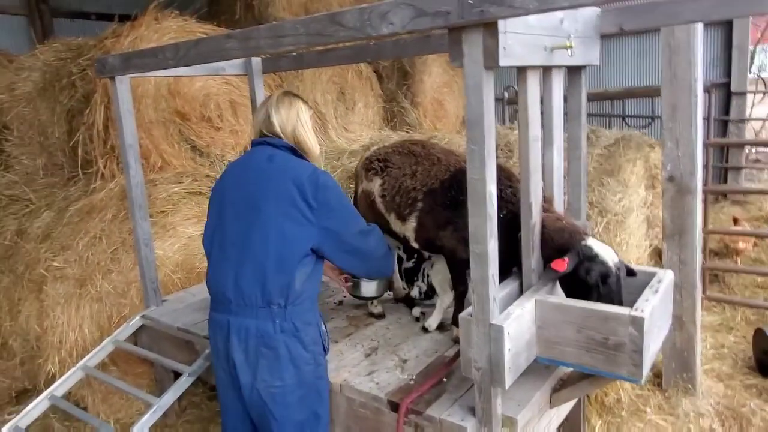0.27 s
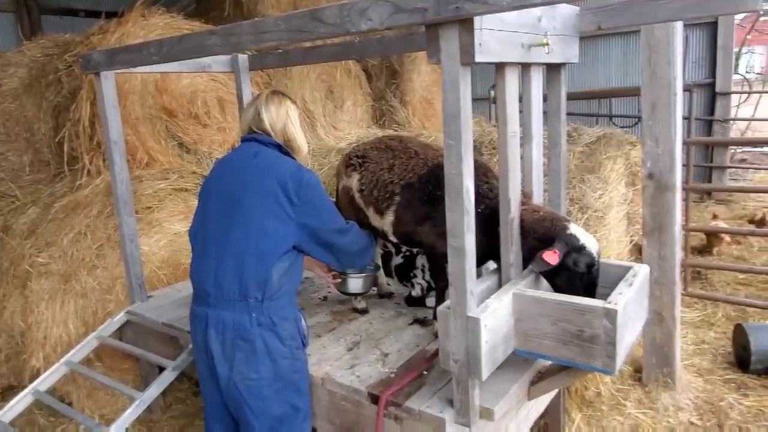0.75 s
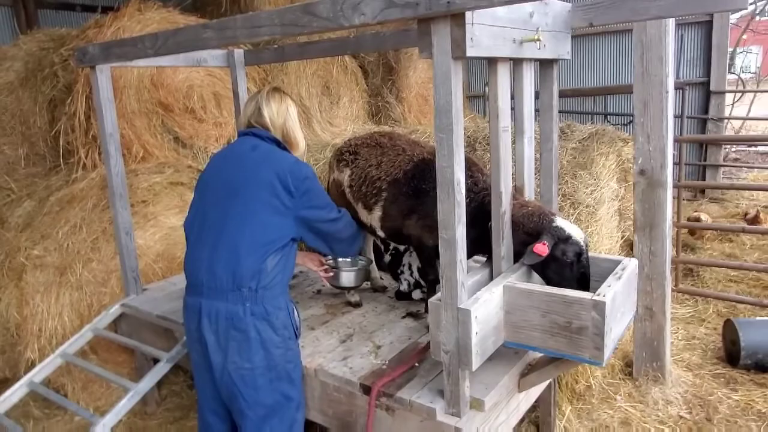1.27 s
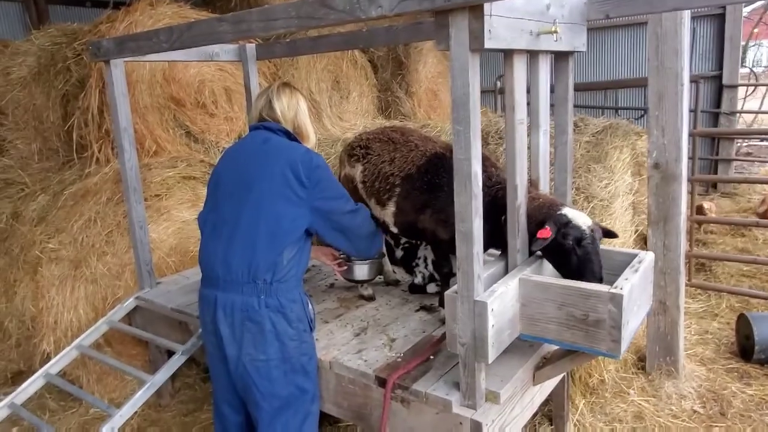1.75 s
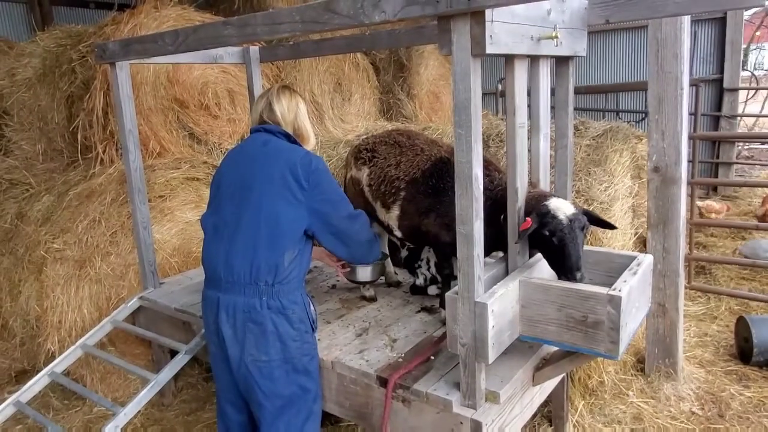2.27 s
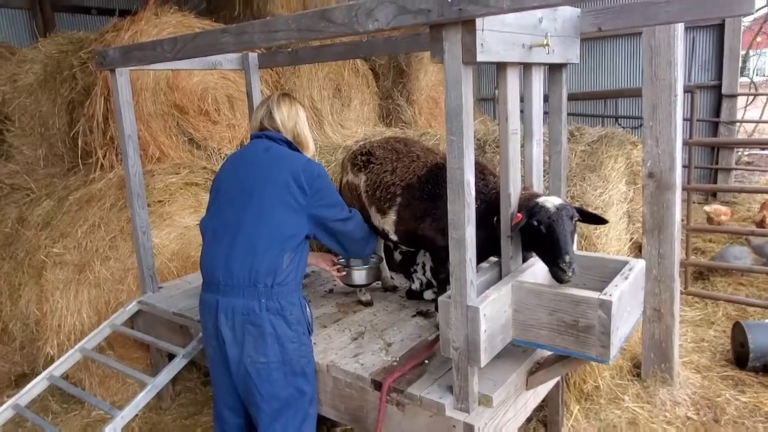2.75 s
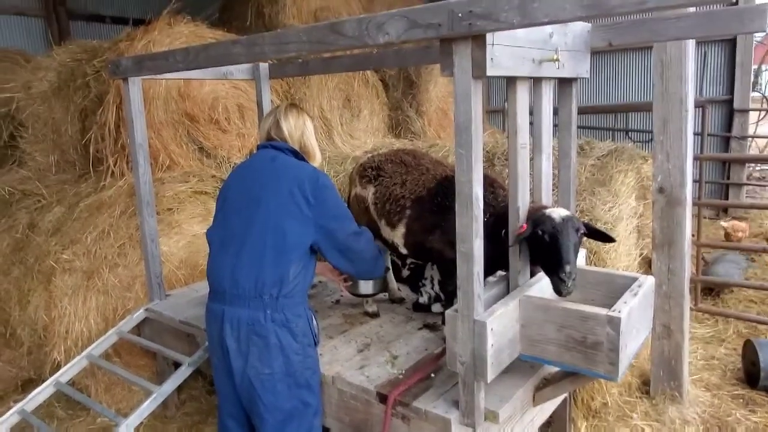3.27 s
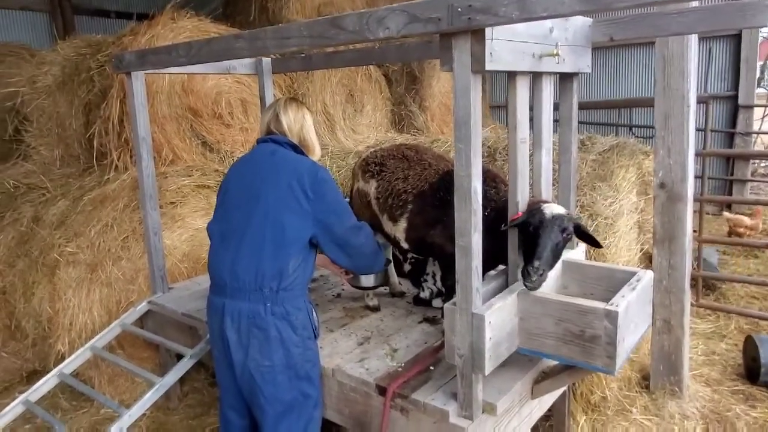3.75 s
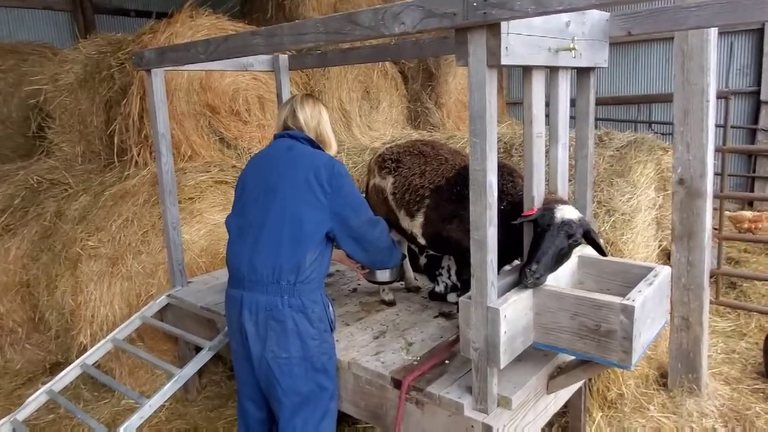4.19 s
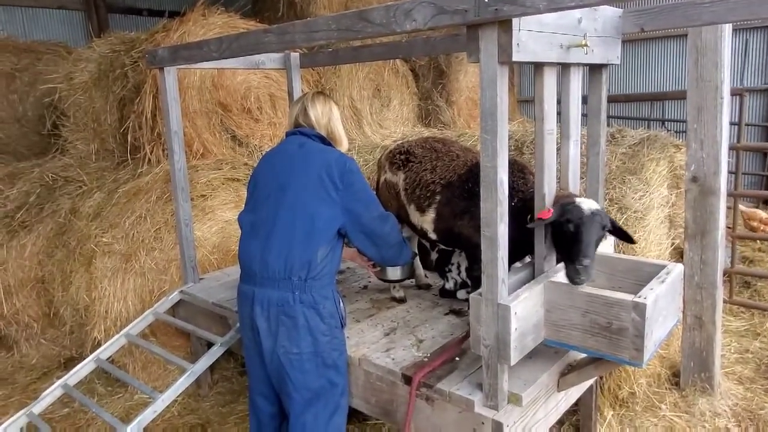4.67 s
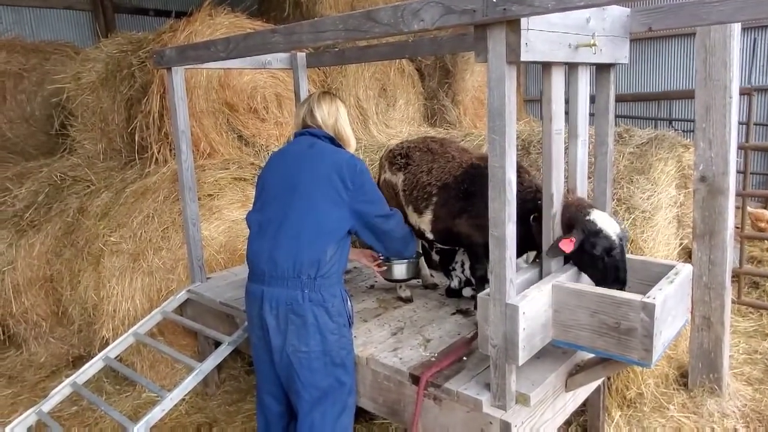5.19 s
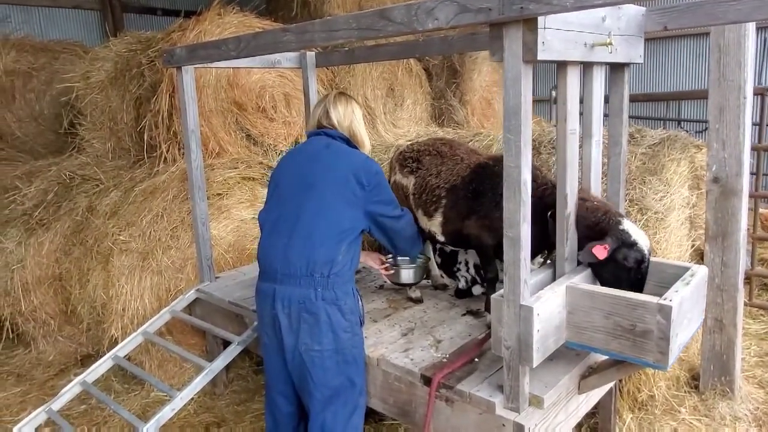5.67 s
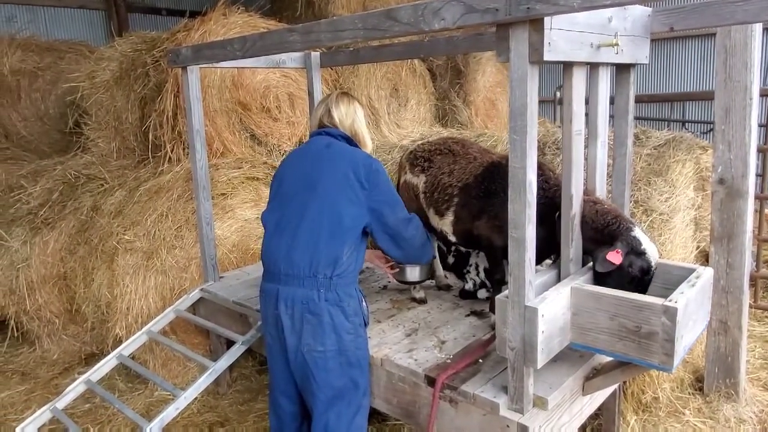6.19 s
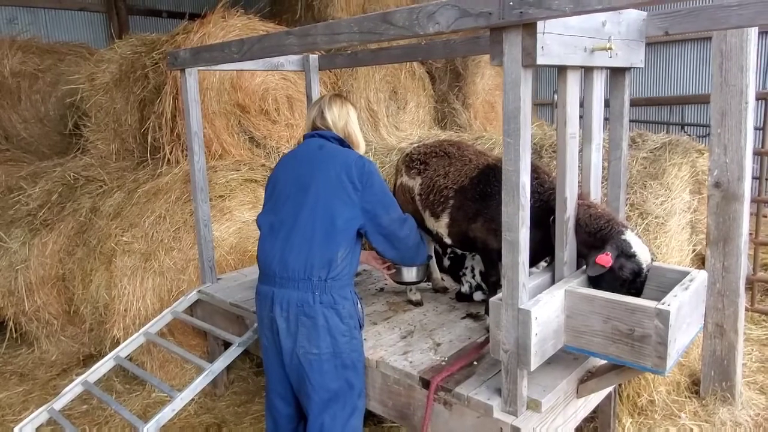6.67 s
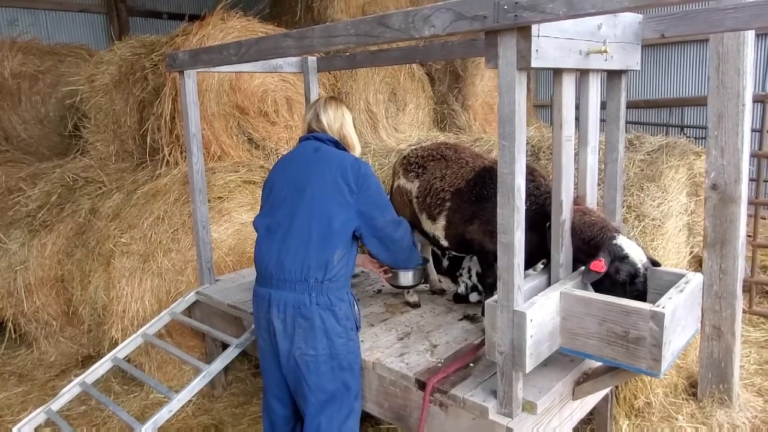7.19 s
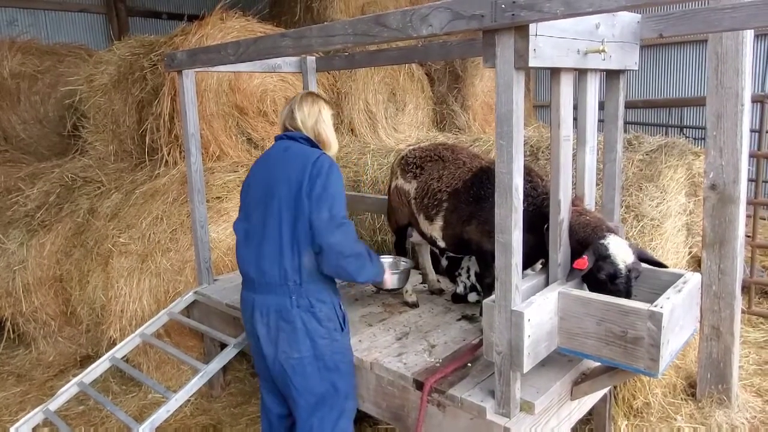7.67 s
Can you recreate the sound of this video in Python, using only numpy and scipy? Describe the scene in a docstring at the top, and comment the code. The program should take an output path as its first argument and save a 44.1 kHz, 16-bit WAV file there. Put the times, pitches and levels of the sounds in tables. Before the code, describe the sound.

A sheep and a ewe call to each other in a quiet barn with a short echo. For the first two seconds or so, feed crackles softly in a wooden trough among several dull knocks, strongest around 0.6 seconds. Just then, the sheep gives a high, quavering bleat from the left. A faint swish and a tiny metal ring come at about 2.1 seconds. From 2.4 to 3.1 seconds the ewe, close and slightly right, answers with a deep, fluttering, closed-mouth rumble. The loudest bleat follows from 3.3 to 4.3 seconds, and she rumbles again from 4.4 to 4.9. Another long, trembling bleat runs from 5 to 6 seconds. Small ticks, faint feed rustles and a second soft swish fill the gap until a shorter last bleat from 7.3 to about 8 seconds. The calls stand well above everything else.

```python
"""A sheep in a hay barn gives four high, quavering bleats from the left: tight vocal folds buzz through
its open mouth, and the voice dips at each catch of the throat. A close ewe on a milking stand answers
twice with a deep, fluttering rumble, slack folds beating behind a shut mouth. Between the calls she
noses through the feed in a wooden trough. Small knocks, two soft swishes and a faint ring of metal
sit over the quiet air of the barn."""
import sys
import numpy as np
from scipy import signal
from scipy.fft import rfft, irfft
from scipy.io import wavfile
from scipy.ndimage import uniform_filter1d

SR = 44100
rng = np.random.default_rng(int(sys.argv[2]) if len(sys.argv) > 2 else 0)


def dump(signal):
    """Clip the signal to [-1, 1] and save it as 16-bit WAV at the path in sys.argv[1]."""
    limited = np.clip(np.atleast_2d(signal).T, -1, 1)
    pcm = np.round(limited * 32767).astype(np.int16)
    wavfile.write(sys.argv[1], SR, pcm)


N = 350154
TIME = np.arange(N) / SR
TOP_HZ = 15950


def gain_of(db):
    """Decibels to amplitude."""
    return 10 ** (np.asarray(db) / 20)


def unit_rms(x):
    """Scales to rms 1."""
    return x / np.sqrt(np.mean(x ** 2) + 1e-20)


def levelled(x, samples):
    """Rides the gain to hold the running rms at 1."""
    return x / np.sqrt(uniform_filter1d(x ** 2, size=samples) + 1e-12)


def curve_at(points, hz):
    """Reads a curve on a log-frequency axis."""
    f, value = np.transpose(points)
    return np.interp(np.log(hz + 1), np.log(f + 1), value)


def add(mix, start_s, sound):
    """Lays a sound into the mix."""
    part = mix[..., max(round(start_s * SR), 0):][..., :sound.shape[-1]]
    part += sound[..., :part.shape[-1]]


def eq(x, points, size=4096):
    """Minimum-phase EQ along a curve."""
    log_gain = np.log(gain_of(curve_at(points, abs(np.fft.fftfreq(size, 1 / SR)))))
    impulse = np.fft.ifft(np.exp(np.conj(signal.hilbert(log_gain)))).real[:size // 2]
    return signal.oaconvolve(x, impulse.reshape((1,) * (x.ndim - 1) + (-1,)), axes=-1)[..., :x.shape[-1]]


def lowpass(x, hz):
    """Zero-phase low-pass."""
    return signal.sosfiltfilt(signal.butter(3, hz, fs=SR, output="sos"), x)


def wander(count, hz):
    """Random drift of rms 1, rolling off above hz."""
    f = np.fft.rfftfreq(count, 1 / SR)
    return unit_rms(irfft(rfft(rng.standard_normal(count)) / (1 + (f / hz) ** 4), count))


def resonate(x, hz, width_hz):
    """A unity-gain resonance at a steady or gliding frequency."""
    carrier = np.exp(2j * np.pi * np.cumsum(np.broadcast_to(hz, len(x))) / SR)
    pole = np.exp(-np.pi * width_hz / SR)
    return 2 * (carrier * signal.lfilter([1 - pole], [1, -pole], x / carrier)).real


def formants(x, table, shift):
    """Parallel resonances, all tuned by the ratio shift."""
    return sum(gain_of(db) * resonate(x, hz * shift, width_hz) for hz, width_hz, db in table)


def delayed(x, ms):
    """Fractional delay."""
    return irfft(rfft(x) * np.exp(-2j * np.pi * np.fft.rfftfreq(N, 1 / SR) * ms / 1000), N)


def mono_bass(pair, below_hz):
    """Narrows the low end to mono."""
    return pair + lowpass(pair[0] - pair, below_hz)


# Room tone EQ: freq_hz, gain_db
AIR_EQ = [(12, -62), (20, -28), (43, -10), (96, -5), (146, -10.5), (248, -23.5), (499, -18.5), (897, -26),
          (1660, -25), (2260, -30.5), (16000, -43)]


def barn_air(level_db=-59.5):
    """A low, gently drifting bed of room tone."""
    noise = rng.standard_normal((2, N))
    bed = eq(mono_bass(noise, 300) + 0.34 * noise[::-1], AIR_EQ)
    return gain_of(level_db + .8 * wander(N, 5)) * unit_rms(bed)


def grains(per_s, spread_db):
    """Sparse stereo clicks of uneven size."""
    size = gain_of(spread_db * np.minimum(rng.exponential(1, (2, N)), 4))
    return size * rng.standard_normal((2, N)) * (rng.random((2, N)) < per_s / SR)


# Pushes of the muzzle: start_s, length_s, boom_db, crackle_db
MUZZLE_PUSHES = [(0.041, 0.28, -51.5, -56), (0.35, 1, -51.5, -60.5), (1.208, 0.2, -47, -48),
                 (1.457, 0.25, -49, -54), (1.683, 0.33, -53, -53), (1.867, 0.84, -62, -60.5),
                 (2.171, 0.16, -57.5, -53.5), (6.31, 0.048, -67, -70), (6.45, 0.024, -66.5, -87),
                 (6.656, 0.08, -63.5, -86), (7.108, 0.1, -61, -68)]
# Body of the trough and crackle of the husks: freq_hz, gain_db
TROUGH_EQ = [(88, -51), (150, -0.5), (319, -1.5), (509, 2.5), (871, -5), (2280, -24.5), (2720, -16),
             (4000, -24), (5200, -70), (8800, -120)]
HUSK_EQ = [(710, -19.5), (1200, -17.5), (1440, -13.5), (2270, -19.5), (2860, -19.5), (3080, -23.5),
           (7740, -29.5), (16000, -38)]


def feeding(boom_floor_db=-71, crackle_floor_db=-72, rise_share=0.16):
    """Grain shifts under the ewe's muzzle: the wooden trough booms softly and the husks crackle."""
    boom_power, crackle_power = gain_of(boom_floor_db) ** 2, gain_of(crackle_floor_db) ** 2
    for start_s, length_s, boom_db, crackle_db in MUZZLE_PUSHES:
        push = np.interp(TIME - start_s, [0, rise_share * length_s, length_s], [0, 1, 0])
        boom_power += push * gain_of(boom_db) ** 2
        crackle_power += push * gain_of(crackle_db) ** 2
    boom = unit_rms(eq(mono_bass(grains(per_s=900, spread_db=0.82), 590), TROUGH_EQ))
    crackle = unit_rms(eq(grains(per_s=1300, spread_db=3.2), HUSK_EQ))
    return np.sqrt(boom_power) * boom + np.sqrt(crackle_power) * crackle


# Knocks and ticks around the stand: start_s, thud_db, snap_db
STAND_KNOCKS = [(0.061, -46, -49), (0.342, -44.5, -45), (0.589, -31.5, -38), (.652, -28, -44),
                (.788, -32.5, -52), (1.263, -36, -39), (1.409, -49, -37.5), (1.593, -44, -55),
                (1.632, -68, -42.5), (2.06, -46, -59), (6.136, -71, -40), (6.487, -75, -49),
                (6.805, -70, -45), (6.959, -55, -34), (7.079, -47, -41.5)]
# The two layers of a knock: freq_hz, gain_db
THUD_EQ = [(20, -67), (60, 6.5), (130, -8), (330, -2), (600, -1.5), (1200, -14), (4000, -29)]
SNAP_EQ = [(300, -31), (1500, -21.5), (7000, -12), (16000, -16.5)]


def knocks(thud_s=0.018, snap_s=0.002):
    """Each knock is a dull wooden thud with a short, dry snap on top."""
    out, t = np.zeros((2, N)), np.arange(4000) / SR
    for start_s, thud_db, snap_db in STAND_KNOCKS:
        thud = eq(rng.standard_normal(len(t)) * np.exp(-t / thud_s), THUD_EQ)
        snap = eq(rng.standard_normal((2, len(t))) * np.exp(-t / snap_s), SNAP_EQ)
        add(out, start_s, gain_of(thud_db) * thud / abs(thud).max())
        add(out, start_s, gain_of(snap_db) * snap / abs(snap).max())
    return out


def fold_pulses(cycles, hz, closing_s):
    """One pulse a cycle; the vocal folds close like a zip, smearing it over closing_s."""
    pitch_hz = np.median(hz)
    count = int(TOP_HZ / pitch_hz)
    lag = closing_s * pitch_hz / count / 2
    return unit_rms(sum(np.cos(2 * np.pi * k * (cycles - lag * k)) for k in range(1, count)))


def puffs(cycles, open_share):
    """Breath noise let through at each opening of the folds."""
    return unit_rms(np.exp(-(cycles % 1) / open_share) * rng.standard_normal(len(cycles)))


def tight_folds(hz, rough, jitter=.02, shimmer=.45, rattle=.45, breath=.6):
    """A breathy buzz; under strain the folds jitter and a second, slower vibration adds sidebands."""
    count = len(hz)
    cycles = np.cumsum(hz * (1 + jitter * rough * wander(count, 154) + 0.00233 * wander(count, 42))) / SR
    slow_mode = np.sin(2 * np.pi * np.cumsum(115 * (1 + 0.202 * wander(count, 27.8))) / SR)
    strength = 1 + rough * (shimmer * wander(count, 131) + rattle * slow_mode)
    buzz = fold_pulses(cycles, hz, closing_s=.0016) * strength
    return buzz + breath * (.06 + rough) * puffs(cycles, open_share=.9)


def catches(t, quaver, fall_s=0.009, recover_s=0.02, scatter_s=0.0034):
    """Pitch drop in Hz: the throat catches fast and recovers slowly, easing where the voice steadies."""
    first_s, every_s, drop_hz, steady_at_s, steady_s = quaver
    times = np.arange(first_s, t[-1], every_s)
    late, uneven = rng.standard_normal((len(times), 2)).T
    drops = drop_hz * (1 - np.exp(-((times - steady_at_s) / steady_s) ** 2)) * np.exp(0.138 * uneven)
    since = t[:, None] - times - scatter_s * late
    return np.exp(-.5 * (since / np.where(since < 0, fall_s, recover_s)) ** 2) @ drops


PARTING_S = 0.08  # the lips part this long before the mouth opens


def bleat_envelopes(call, quaver, opening_s=0.012, strain_s=0.14, waver_hz=1.61):
    """The mouth springs open, the voice scoops up, arches and quavers, then sags as the mouth shuts."""
    (open_s, shut_s, release_s, top_hz, arch, crest, effort_db, tiring_db,
     rough, lows_db, lows_fade_db, treble_db, treble_fade_db) = call
    t = np.arange(open_s - PARTING_S, shut_s + release_s, 1 / SR)
    parting = np.clip((open_s - t) / PARTING_S, 0, 1)
    opened = .5 + .5 * np.tanh((t - open_s) / opening_s)
    held = np.clip((t - open_s) / (shut_s - open_s), 0, 1)
    shut = np.clip((t - shut_s) / release_s, 0, 1)
    bow = 1 - arch * (2 * (held - crest)) ** 2
    catch_hz = catches(t, quaver)
    flat = 0.1 * (1 - opened) + 0.1 * parting ** 2 + 0.13 * np.sin(shut * np.pi / 2)
    hz = top_hz * bow * (1 - flat) - catch_hz + waver_hz * wander(len(t), 7.04)
    # higher pitch is louder and fuller; a deeper catch is weaker and rougher
    level_db = effort_db + 48 * np.log2(bow) - tiring_db * held - 0.2062 * catch_hz
    last_push = np.exp(-((t - shut_s) / 0.012) ** 2)
    level_db += 2 * last_push - 36.5 * shut ** 2.68
    lows_db = lows_db + 28 * np.log2(bow - catch_hz / top_hz) - lows_fade_db * held + 11 * shut
    # the attack is rough and bright, and the rasp returns just before the release
    strain = np.exp(-np.maximum(t - open_s, 0) / strain_s)
    end_rasp = np.exp(np.minimum(t - shut_s, 0) / 0.057)
    rough = np.clip(rough + 0.33 * strain + 0.23 * end_rasp + 0.012 * catch_hz, 0, 1)
    treble_db = treble_db + 4 * strain - treble_fade_db * held
    return t, hz, level_db, rough, opened, lows_db, treble_db


# Tone of the bleating throat: freq_hz, gain_db
THROAT_EQ = [(170, -7.5), (350, -13), (700, -4), (1100, -3), (1450, -9.5), (1850, -9), (3000, -3.5),
             (3900, -5.5), (5600, -12.5), (8400, -17.5), (9700, -24.5), (16000, -27.5)]
# Resonances of the parting lips and of the throat: freq_hz, width_hz, gain_db
LIP_FORMANTS = [(880, 390, 3.5), (1780, 300, 4), (4710, 750, 7)]
THROAT_FORMANTS = [(816, 14, 7), (1172, 19.3, 9.5), (3330, 163, 8), (6440, 100, 3), (8800, 330, -19.5),
                   (11180, 740, -1)]


def bleat(call, quaver, mouth, flare_at_s=0.14, flare_s=0.024, jaw_s=0.098, crack_s=0.094):
    """Tight folds buzz through a trembling throat and a moving mouth; gives start time and sound."""
    t, hz, level_db, rough, opened, lows_db, treble_db = bleat_envelopes(call, quaver)
    start_hz, wide_hz, first_db, shrill_hz, shrill_db, crack_db, depth_db, squeak_db = mouth
    age, sinking = t - t[0], np.linspace(1, -1, len(t))
    voice = eq(tight_folds(hz, rough), THROAT_EQ)
    # the lips part with a small rising squeak
    parted = np.minimum(age / PARTING_S, 1)
    lips = formants(voice, LIP_FORMANTS, shift=0.91 + 0.22 * parted)
    squeak = unit_rms(lowpass(lips, 10000)) * np.sin(np.pi * parted) ** 2
    voice += formants(voice, THROAT_FORMANTS, shift=1 + 0.013 * wander(len(t), 11.6))
    # the deep part of the vowel thins out
    voice += (gain_of(depth_db + 3 * sinking) - 1) * resonate(voice, 750, width_hz=150)
    # the shrill formant flares as the mouth springs open; the first formant follows the jaw
    flare = np.exp(-.5 * ((age - flare_at_s) / flare_s) ** 2)
    voice += 0.69 * flare * resonate(voice, 5600, width_hz=1300)
    shrill = resonate(voice, shrill_hz + 620 * flare + 120 * sinking, width_hz=315)
    first_hz = wide_hz + (start_hz - wide_hz) * np.exp(-np.maximum(age - PARTING_S, 0) / jaw_s)
    voice += gain_of(first_db) * resonate(voice, first_hz, width_hz=110) + gain_of(shrill_db) * shrill
    # as the breath gives out, the voice cracks into a hollow "eh"
    ending = np.exp(-((t[-1] - t) / crack_s) ** 4)
    voice += ending * gain_of(crack_db) * resonate(voice, 1320, width_hz=92)
    lows, body = lowpass(voice, 1860), lowpass(voice, 5150)
    mids, treble = body - lows, voice - body
    voice = gain_of(lows_db) * unit_rms(lows) + unit_rms(mids) + gain_of(treble_db) * unit_rms(treble)
    voice = opened * levelled(voice, 1500) * gain_of(level_db) + squeak * gain_of(squeak_db)
    return t[0], voice * signal.windows.tukey(len(t), .02)


# The bleats: open_s, shut_s, release_s, top_pitch_hz, arch_share, crest_share, effort_db, tiring_db,
# roughness, lows_db, lows_fade_db, treble_db, treble_fade_db
BLEAT_CALLS = [(0.592, 1.134, 0.16, 367.8, 0.0072, 0.16, -23.5, 4, 0.16, 0.5, 4, -4.5, 7),
               (3.284, 4.274, 0.055, 393.7, 0.068, 0.49, -19.5, 3.5, 0.07, 7.5, 8, 1.5, 15.5),
               (5.019, 5.989, 0.09, 381.2, 0.045, 0.55, -20.5, 2, 0.16, 0.5, -0.5, -5.5, 0.5),
               (7.291, 7.815, 0.15, 351.2, 0.0016, 0.53, -24, 3.5, 0.13, -1, -0.5, -2, 3)]
# Quaver of each bleat: first_catch_s, every_s, drop_hz, steady_at_s, steady_for_s
BLEAT_QUAVERS = [(0.66, 0.067, 17.2, 0.98, 0.12), (3.334, 0.083, 18.2, 3.92, 0.34),
                 (5.074, 0.072, 24, 6.0, 0.13), (7.339, 0.0835, 12.3, 7.55, 0.046)]
# Mouth of each bleat: first_formant_start_hz, first_formant_wide_hz, first_formant_db, shrill_hz,
# shrill_db, crack_db, vowel_depth_db, squeak_db
BLEAT_MOUTHS = [(1020, 1475, 5, 4650, 14.5, 4, -11, -41.5), (1050, 1280, 7, 4646, 13, -24, 1, -46.5),
                (1080, 1214, 8, 4680, 13.5, 11.5, -2.5, -48), (1045, 1390, 14, 4810, 16, 8, -1.5, -38)]
# Pan by frequency: freq_hz, left_minus_right_db
BLEAT_PAN = [(60, -31), (110, 1), (200, 9.5), (380, 3.5), (700, 4.5), (1290, -1), (2380, 8.5), (4400, 2.5),
             (8120, 24), (15000, 2)]
# Tone of what arrives by way of the walls: freq_hz, gain_db
REVERB_EQ = [(300, 3.5), (2000, 1), (5000, 0), (10000, 8.5)]


def bleating_sheep(near_db=-1, reverb_db=-10):
    """Four bleats off to the left: the right ear hears them later and duller."""
    voice = np.zeros(N)
    for call, quaver, mouth in zip(BLEAT_CALLS, BLEAT_QUAVERS, BLEAT_MOUTHS):
        add(voice, *bleat(call, quaver, mouth))
    lean = gain_of(curve_at(BLEAT_PAN, np.fft.rfftfreq(N, 1 / SR)))
    pan = np.array([lean, np.ones_like(lean)]) / np.sqrt((1 + lean ** 2) / 2)
    left, right = irfft(rfft(voice) * pan, N)
    near = np.array([left, delayed(right, ms=.465)]) + early_reflections(voice)
    return gain_of(near_db) * near + gain_of(reverb_db) * eq(barn_reverb(voice), REVERB_EQ)


# Reflection taps: delay_ms, left_gain, right_gain
REFLECTIONS = [(1.9, 0.073, 0.14), (4.3, -0.083, 0.086), (7.7, -0.075, -0.1), (12.6, 0.18, 0.18)]


def early_reflections(voice):
    """First bounces off floor, posts and wall."""
    return sum(np.outer([left, right], delayed(voice, ms)) for ms, left, right in REFLECTIONS)


# Decay of the barn: freq_hz, t60_s
BARN_DECAY = [(100, 0.51), (500, 0.37), (1500, 0.31), (4000, 0.3), (8000, 0.22), (16000, 0.074)]


def barn_reverb(x, predelay_s=0.01, echoes_per_s=3000):
    """A tail of scattered echoes; the hay swallows the treble first."""
    taps = rng.choice([-1., 1.], (2, SR)) * (rng.random((2, SR)) < echoes_per_s / SR)
    taps *= np.arange(SR) / SR > predelay_s
    hz, t, spectrum = signal.stft(taps, SR, nperseg=256)
    decay = gain_of(-60 * t / curve_at(BARN_DECAY, hz)[:, None])
    tail = signal.istft(spectrum * decay, SR, nperseg=256)[1]
    return signal.fftconvolve(x[None], tail / np.linalg.norm(tail[0]), axes=1)[:, :N]


# Soft swishes: start_s, length_s, level_db, left_minus_right_db
SWISH_CUES = [(2.11, 0.2, -59.5, 6), (6.855, 0.21, -60.5, 6.5)]
# Their airy tone: freq_hz, gain_db
SWISH_EQ = [(1500, -2), (3000, 3), (5000, -2), (7300, 12.5), (10000, -8), (16000, -20)]


def swishes():
    """Brief soft hisses, as of straw or cloth sliding."""
    out = np.zeros((2, N))
    for start_s, length_s, level_db, pan_db in SWISH_CUES:
        hiss = unit_rms(eq(rng.standard_normal((2, round(length_s * SR))), SWISH_EQ))
        hiss *= signal.windows.tukey(hiss.shape[1], .6)
        add(out, start_s, hiss * gain_of([[level_db + pan_db / 2], [level_db - pan_db / 2]]))
    return out


# Partials of the metal: freq_hz, level_db
METAL_PARTIALS = [(2859, -63), (3510, -77), (6126, -72), (7671, -81), (7752, -77), (7870, -82)]


def metal_ping(start_s=2.135, length_s=0.15, gain=0.729):
    """A faint ring of metal, each partial wavering on its own."""
    out, t = np.zeros(N), np.arange(round(length_s * SR)) / SR
    tone = sum(gain_of(db) * np.sin(2 * np.pi * hz * t) * (1 + 0.72 * wander(len(t), 25))
               for hz, db in METAL_PARTIALS)
    add(out, start_s, tone * signal.windows.tukey(len(t), .3))
    return gain * (out + barn_reverb(out))


def flutter(t, every_s, height_db=12.5, surge_s=0.017, merge_s=0.36):
    """Gain of the surges of air, which stumble in time and strength and merge as the call goes on."""
    since_surge = abs(t + 0.002 * wander(len(t), 16)) % every_s
    surges = np.exp(-(t / merge_s) ** 2 - (since_surge / surge_s) ** 2)
    return gain_of(height_db * surges + 1.4 * wander(len(t), 27))


# The ewe's throat and nose, mouth shut: freq_hz, gain_db
NOSE_EQ = [(60, -30.5), (150, 3), (370, -9.5), (550, -6), (1350, -7), (1800, -3.5), (2200, -13.5),
           (2550, -24.5), (3600, -41.5), (4700, -33), (5400, -29.5), (7800, -36), (9600, -33.5),
           (16000, -36)]
# What rings after each of her pulses: freq_hz, width_hz, gain_db
NOSE_FORMANTS = [(143, 82, -1), (540, 16, -2), (990, 51, -1), (1620, 390, -2), (3060, 160, 1.5),
                 (4580, 98, 10.5)]


def rumble(call, release_s=0.072, rise_db_per_s=3.5, jitter=.05, shimmer=0.14, breath=0.54):
    """Slack folds beat unevenly behind a shut mouth; gives start time and sound."""
    start_s, end_s, swell_s, swell_db, full_hz, full_db, surge_every_s, chest_gain = call
    t = np.arange(0, end_s - start_s, 1 / SR)
    # quieter, lower and duller at both ends
    slack = np.maximum(1 - t / swell_s, 0)
    release = np.maximum(1 - (t[-1] - t) / release_s, 0)
    level_db = full_db - swell_db * slack + rise_db_per_s * np.maximum(t - swell_s, 0) - 3.5 * release
    hz = full_hz * (1 - 0.18 * slack - 0.0393 * release)
    bright_db = -5 - 7 * slack ** 2 - 7 * release
    surges = flutter(t, surge_every_s)
    cycles = np.cumsum(hz * (1 + jitter * wander(len(t), 58.3))) / SR
    buzz = lowpass(fold_pulses(cycles, hz, closing_s=0.0045), 7500)
    buzz += breath * puffs(cycles, open_share=0.78)
    voice = eq(buzz * surges * (1 + shimmer * wander(len(t), 76)), NOSE_EQ)
    # her formants waver and rise a little as the jaw loosens
    voice += formants(voice, NOSE_FORMANTS, np.linspace(.98, 1.02, len(t)) + 0.027 * wander(len(t), 25))
    chest = lowpass(voice, 650)
    voice = levelled(chest_gain * chest + (voice - chest) * gain_of(bright_db), 3600)
    return start_s, -voice * gain_of(level_db) * signal.windows.tukey(len(t), .015)


# Her answers: start_s, end_s, swell_s, swell_db, full_pitch_hz, full_effort_db, surge_every_s, chest_gain
RUMBLE_CALLS = [(2.399, 3.077, 0.28, 15.5, 132.8, -24.5, 0.034, 0.42),
                (4.379, 4.895, 0.2, 13, 130.8, -25, 0.0385, 0.5)]


def rumbling_ewe(left_db=-3.0, right_db=-2.5, early_db=-2, reverb_db=-17):
    """Two rumbles, close by and a little to the right."""
    voice = np.zeros(N)
    for call in RUMBLE_CALLS:
        add(voice, *rumble(call))
    direct = np.array([delayed(voice, ms=.225), voice]) * gain_of([[left_db], [right_db]])
    room = gain_of(early_db) * early_reflections(voice) + gain_of(reverb_db) * barn_reverb(voice)
    return direct + mono_bass(room, 470)


def scene():
    """Both sheep over the small sounds of the barn."""
    return bleating_sheep() + rumbling_ewe() + feeding() + knocks() + swishes() + metal_ping() + barn_air()


def record(dry):
    """A steep low-pass on the whole mix."""
    high_cut = signal.firwin(511, TOP_HZ, window=("kaiser", 9), fs=SR)
    return signal.oaconvolve(dry, high_cut[None], "same", axes=1)


dry = scene()
out = record(dry)
dump(out)
```